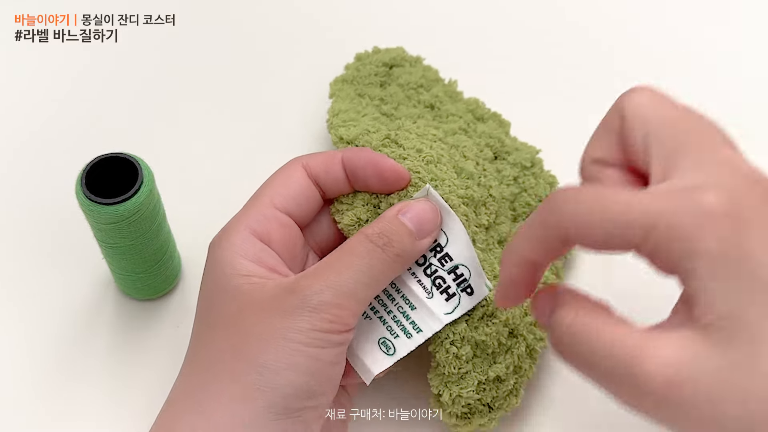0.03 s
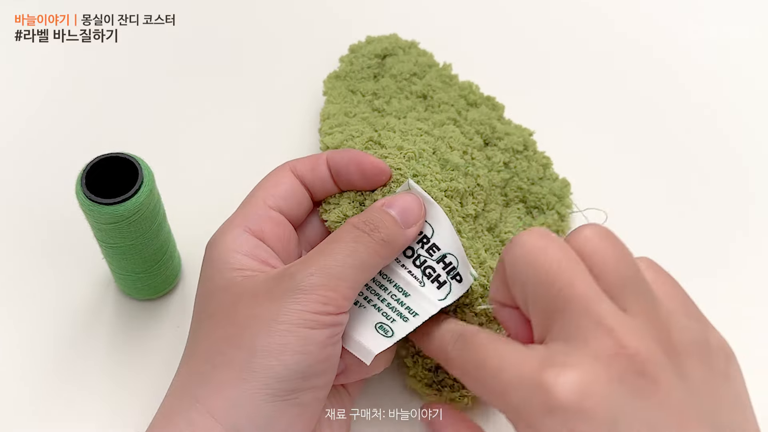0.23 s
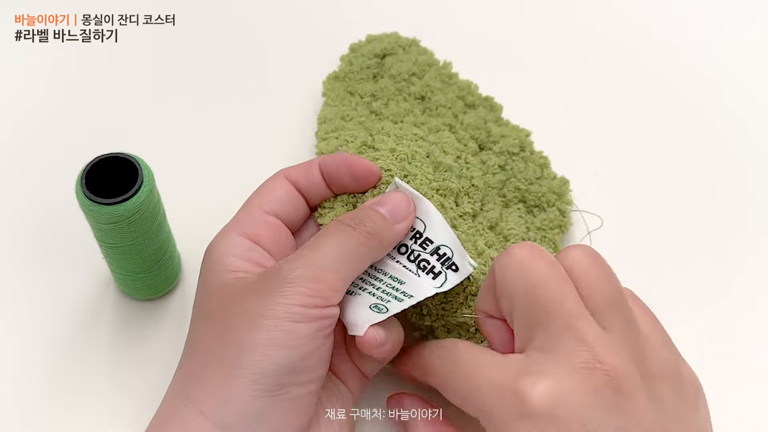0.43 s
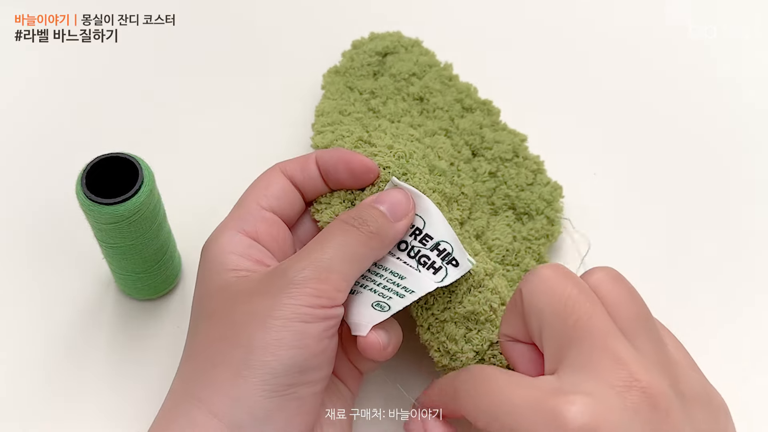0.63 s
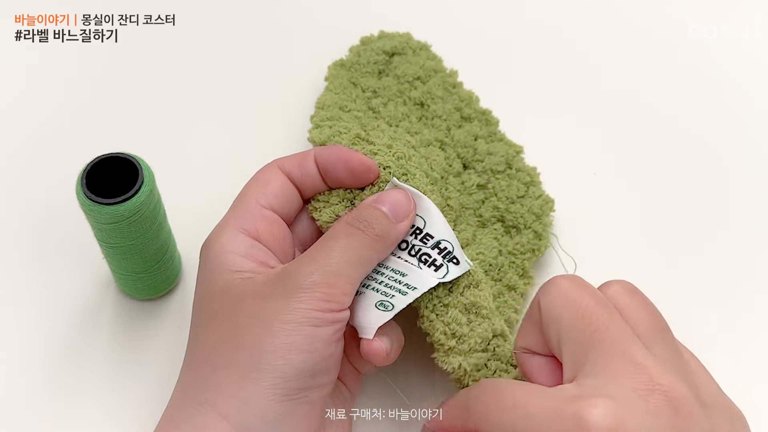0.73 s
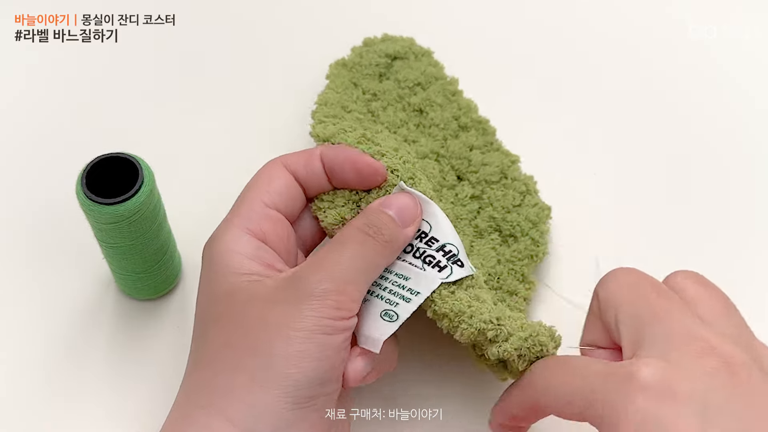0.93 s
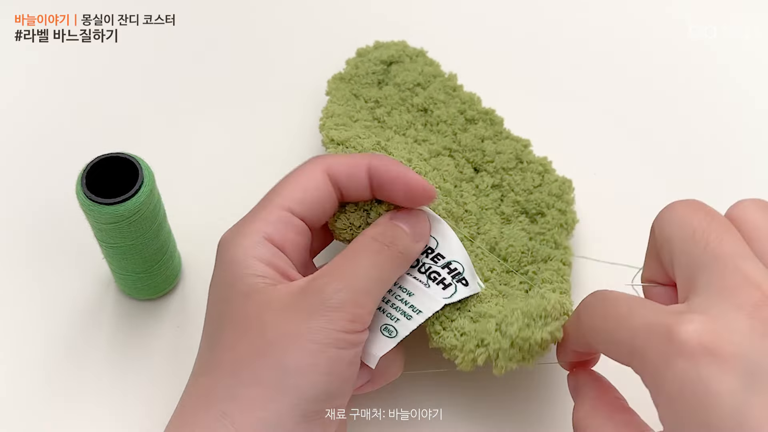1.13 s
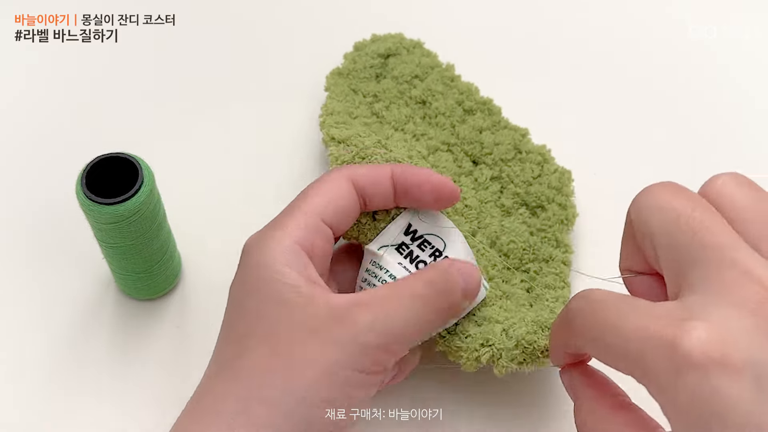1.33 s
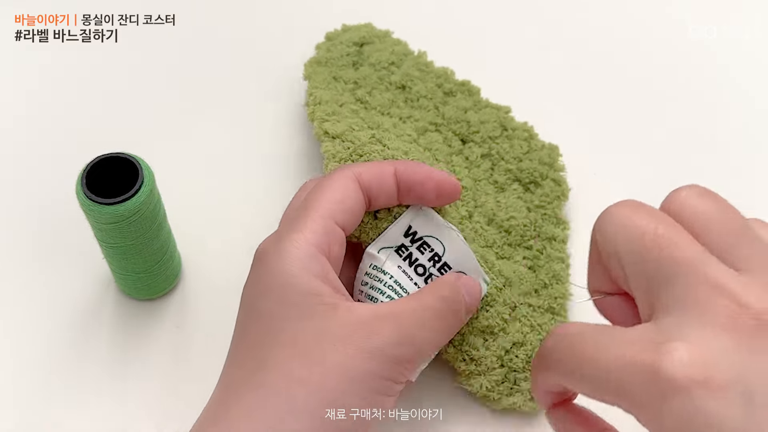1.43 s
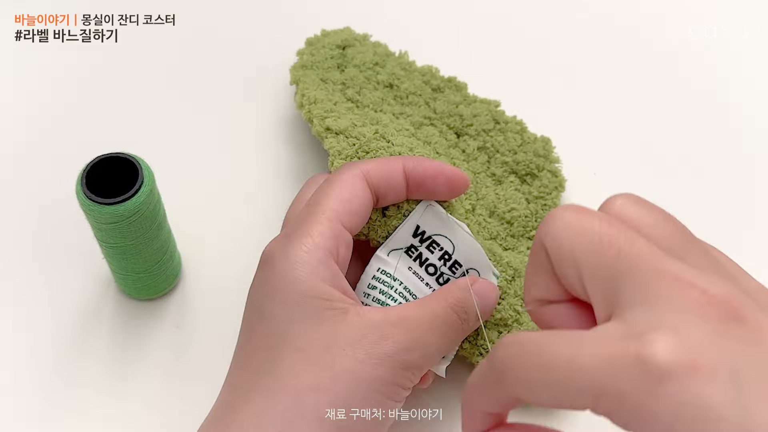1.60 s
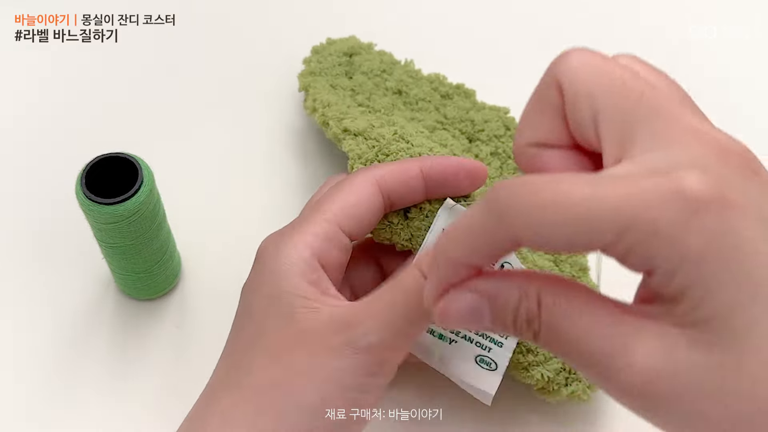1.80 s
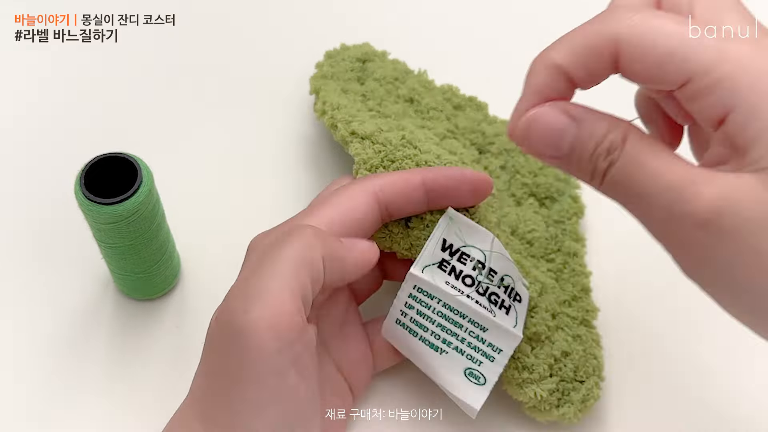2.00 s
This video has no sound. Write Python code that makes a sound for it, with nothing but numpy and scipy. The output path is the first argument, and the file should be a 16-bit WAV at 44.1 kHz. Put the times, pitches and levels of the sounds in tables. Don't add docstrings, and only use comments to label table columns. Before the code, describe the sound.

Thread pulled through a cloth label and soft knitted mat: a smooth opening hiss, a crackly scuff with snaps, a longer slide, then scattered ticks and a sharper snap near the end; close microphone, quiet room.

```python
import sys
import numpy as np
from scipy import signal
from scipy.io import wavfile

SR = 44100
rng = np.random.default_rng(int(sys.argv[2]) if len(sys.argv) > 2 else 0)


def magnitude_from_level(level_db):
    exponent = np.asarray(level_db, float) / 20
    return 10 ** exponent


def transcribe(signal):
    frames = np.atleast_2d(signal).T
    limited = np.clip(frames, -1, 1)
    pcm = np.round(limited * 32767).astype(np.int16)
    wavfile.write(sys.argv[1], SR, pcm)


N = 90625

# f/Hz, density/(dB per Hz)
ROOM_COLOUR = [(88, -44), (150, -12), (221, -9.5), (1570, -16.5), (1870, -17), (3220, -18), (4840, -22.5),
               (5990, -21), (15500, -31)]
ROOM_DB = -66.5
# f/Hz, width/Hz, level/dB
BUILDING_RUMBLE = [(35, 9.6, -73.5), (61, 20, -81), (85.1, 15.2, -78), (315.5, 60, -80)]
# f/Hz, wobble/share of f, level/dB
TABLE_TONES = [(163, .05, -61), (107.4, 0.044, -60), (190.8, 0.019, -67.5)]
TABLE_PEAKS = [.06, .082, 0.13]
TABLE_RISES = [40, 300, 60]
TABLE_FALLS = [150, 256, 148]
# t/s, rise/s, fall/s, level/dB, f/Hz
RINGING_STRETCHES = [(.03, 0.099, 0.16, -66.5, 4900), (0.068, 0.034, 0.045, -73, 3480),
                     (1.74, .05, .11, -68, 5250), (.45, 0.064, .08, -72, 1250), (.395, .02, .02, -59.5, 2100),
                     (.403, .012, .02, -60, 1350), (1.88, .02, .04, -63, 1600), (1.93, .02, .03, -69, 860),
                     (.39, 0.016, .03, -59, 7230), (.378, .002, 0.017, -59, 6600),
                     (.405, .012, .015, -64, 12500), (1.26, .01, .04, -68, 2200),
                     (1.885, .015, .015, -65, 8500), (1.725, .025, .03, -65.5, 600),
                     (0.504, .08, 0.25, -71, 315), (1.93, 0.064, 0.056, -71.5, 333),
                     (1.33, .03, .04, -70.5, 2430), (1.73, 0.014, .012, -60, 1790),
                     (1.28, 0.14, 0.19, -74, 539), (1.935, 0.016, 0.031, -69, 597)]
# t/s, peak level/dB, f/Hz, ring/s
TICKS_AND_SNAPS = [(.9229, -46, 2000, .003), (1.506, -50, 3900, .003), (1.508, -45, 2500, .004),
                   (1.5092, -46, 3900, .003), (.9862, -50, 1300, .004), (1.1235, -47, 2600, .006),
                   (1.4055, -47, 2000, .003), (1.4395, -53, 2000, .003), (1.601, -53, 2200, .003),
                   (.878, -53, 7000, .002), (1.7478, -42, 1870, .006), (.3985, -47, 2400, .002),
                   (.3785, -48, 2100, .004), (.4195, -45, 1400, .004), (1.9475, -44, 2400, .003),
                   (1.948, -46, 1500, .005), (1.557, -54, 3300, .003), (1.264, -50, 2300, .004),
                   (.4132, -43, 1500, .003),
    (.4146, -38, 5500, .001),
    (.9224, -40, 4200, .0012),
    (1.7474, -35, 6000, .002),
    (.8905, -43, 7000, .0015),
]
# t/s, rise/s, fall/s, level/dB, brightness/(dB per octave)
LABEL_SCUFFS = [(.378, .001, 0.024, -56.5, -1), (.391, 0.0085, .012, -54, 1.5),
                (.406, .009, 0.024, -48.5, -.5), (.43, 0.0087, 0.033, -63.5, -5),
                (1.26, .005, .05, -60.5, -4), (1.335, 0.0077, .045, -65.5, -5.5),
                (1.505, 0.0026, 0.0069, -57.5, -1), (1.8, 0.018, 0.044, -70, -4.5),
                (1.733, 0.011, 0.013, -52, 0.5), (1.875, .025, 0.046, -55.5, -3),
                (1.943, 0.0037, 0.0084, -55, -3), (1.118, 0.004, .01, -63, -0.5),
                (.982, 0.0037, 0.0067, -67, -3), (0.71, 0.025, 0.035, -69, -6)]
# f/Hz, density/(dB per Hz)
LABEL_COLOUR = [(250, -34), (500, -13.5), (1000, -12.5), (2200, -5.5), (4400, -10), (7000, -4.5),
                (10800, -14.5), (15500, -14)]
# f/Hz, width/Hz, level/dB
LABEL_RESONANCES = [(1416, 200, -15), (2130, 200, -14), (3320, 100, -16), (7000, 230, -13.5),
                    (8400, 770, -19.5), (12400, 670, -35)]
# t/s, rise/s, fall/s, level/dB, brightness/(dB per octave)
THREAD_PULLS = [
    (0.0087, 0.095, 0.16, -60.5, 1.5),
    (0.204, 0.085, 0.052, -71.5, 0.5),
    (.44, .03, 0.23, -70, -5),
    (.6, 0.077, 0.29, -61.5, 0.5),
    (1.13, 0.044, 0.048, -60.5, 1),
    (1.67, 0.058, 0.066, -58.5, -1),
    (1.75, 0.043, 0.2, -64, 3.5),
    (.78, 0.07, 0.065, -72, -1.5),
    (.14, 0.058, 0.042, -71, -3),
    (1.4, 0.22, .1, -72.5, -6.5),
]
# f/Hz, density/(dB per Hz)
THREAD_COLOUR = [(290, -20), (500, -7.5), (748, -10.5), (1450, -3), (1670, -10), (1820, -3.5), (4980, -4),
                 (15500, -19)]
# f/Hz, width/Hz, level/dB
THREAD_RESONANCES = [(3510, 190, -16.5), (6710, 360, -14.5)]
PORT_HISS_BAND = [8860, 13900]
PORT_OFFSET = [
    [-.0333],
    [-.0389],
]


def rms_one(x):
    return x / np.sqrt(np.mean(x ** 2) + 1e-20)


def drift(rate_hz):
    r = np.exp(-80 * np.pi * rate_hz / SR)
    noise = rng.standard_normal(N // 40 + 2002)
    slow = signal.lfilter([1], [1, -2 * r, r * r], noise)[2000:]
    return np.interp(np.arange(N) / 40, np.arange(len(slow)), rms_one(slow))


def resonate(x, hz, width_hz):
    r = np.exp(-np.pi * width_hz / SR)
    zeros = np.array([1, 0, -1]) * (1 - r * r) / 2
    poles = [1, -2 * r * np.cos(2 * np.pi * hz / SR), r * r]
    return signal.lfilter(zeros, poles, x)


def bandpass(x, edges_hz):
    return signal.sosfilt(signal.butter(2, edges_hz, "band", fs=SR, output="sos"), x)


def swell(t, start, rise, fall):
    return np.interp(t, [start, start + rise, start + rise + fall], [0, 1, 0])


def bands(source, colour, patchy_db, rate_hz):
    edges = 100 * 2 ** np.arange(0, 7.6, .5)
    centres = np.sqrt(edges[1:] * edges[:-1])
    points = np.array(colour)
    level = np.interp(np.log(centres), np.log(points[:, 0]), points[:, 1], left=points[0, 1] - 8)
    parts = []
    for k in range(len(centres)):
        gain = magnitude_from_level(level[k] + patchy_db * drift(rate_hz))
        parts.append(gain * bandpass(source[k % 2], edges[k:k + 2]))
    return np.array(parts), centres


def grains(per_s, spread_db):
    size = magnitude_from_level(spread_db * np.minimum(rng.exponential(1, (2, N)), 4))
    sign = rng.choice([-1, 1], (2, N))
    slips = rng.random((2, N)) < per_s / SR
    return rms_one(size * sign * slips)


def rubbing(strokes, source, colour, resonances, curve, patchy_db, rate_hz):
    parts, hz = bands(source, colour, patchy_db, rate_hz)
    parts = parts / np.sqrt(np.mean(parts.sum(0) ** 2))
    rings = []
    for k, (f, width, db) in enumerate(resonances):
        gain = magnitude_from_level(db + patchy_db * drift(rate_hz))
        rings.append(gain * rms_one(resonate(source[k % 2], f, width)))
    parts = np.vstack([parts, rings])
    hz = np.append(hz, [peak[0] for peak in resonances])
    octaves = np.log2(hz / 3320)
    out, t = np.zeros(N), np.arange(N) / SR
    for start, rise, fall, db, bright_db in strokes:
        shape = swell(t, start, rise, fall) ** curve
        on = shape > 0
        out[on] += shape[on] * (magnitude_from_level(db + bright_db * octaves) @ parts[:, on])
    return out


def building_hum():
    noise = rng.standard_normal((len(BUILDING_RUMBLE), N + SR))
    out = np.zeros(N)
    for stream, (hz, width, db) in zip(noise, BUILDING_RUMBLE):
        ringing = resonate(resonate(stream, hz, width), hz, width)
        out += magnitude_from_level(db) * rms_one(ringing[SR:])
    return out


def room():
    parts, _ = bands(rng.standard_normal((2, N)), ROOM_COLOUR, patchy_db=0.9, rate_hz=5.8)
    return magnitude_from_level(ROOM_DB) * rms_one(parts.sum(0)) + building_hum()


def table():
    t, out = np.arange(N) / SR, np.zeros(N)
    for (hz, wobble, db), peak, up, down in zip(TABLE_TONES, TABLE_PEAKS, TABLE_RISES, TABLE_FALLS):
        pitch = hz * (1 + wobble * drift(12))
        tone = np.sqrt(2) * np.sin(2 * np.pi * np.cumsum(pitch) / SR)
        slope_db = np.minimum(up * (t - peak), -down * (t - peak))
        out += tone * magnitude_from_level(db + 2.0 * drift(15) + slope_db)
    return out


def singing():
    out, t = np.zeros(N), np.arange(N) / SR
    streams = rng.standard_normal((len(RINGING_STRETCHES), N))
    for (start, rise, fall, db, hz), noise in zip(RINGING_STRETCHES, streams):
        tone = rms_one(resonate(noise, hz, 0.05 * hz))
        out += magnitude_from_level(db) * swell(t, start, rise, fall) * tone
    return out


def needle():
    out, t = np.zeros(N + 1000), np.arange(900) / SR
    ratio = np.array([[1], [1.47], [.62]])
    gain = magnitude_from_level(np.array([[-2], [-12], [-12]]))
    for start, db, hz, ring_s in TICKS_AND_SNAPS:
        tones = gain * np.sin(2 * np.pi * hz * ratio * t)
        pulse = tones.sum(0) * magnitude_from_level(-30 * t / ring_s)
        first = int(start * SR)
        out[first:first + 900] += magnitude_from_level(db) * pulse
    return out[:N]


def label():
    slips = grains(per_s=11000, spread_db=3.3)
    return rubbing(LABEL_SCUFFS, slips, LABEL_COLOUR, LABEL_RESONANCES, curve=0.93, patchy_db=1.4, rate_hz=29)


def thread():
    slips = grains(per_s=9000, spread_db=2.7)
    return rubbing(THREAD_PULLS, slips, THREAD_COLOUR, THREAD_RESONANCES, curve=0.9, patchy_db=1.0, rate_hz=11)


def scene():
    mono = room() + table() + singing() + needle() + label() + thread()
    return np.ones((2, 1)) * mono


def top_cut(x):
    return signal.sosfilt(signal.butter(12, 15710, fs=SR, output="sos"), x)


def record(dry):
    noise = rng.standard_normal((2, 2, N))
    hiss = bandpass(noise[0], PORT_HISS_BAND)
    rumble = signal.sosfilt(signal.butter(1, 603, fs=SR, output="sos"), noise[1])
    ports = magnitude_from_level(-86.5) * rms_one(hiss) + magnitude_from_level(-92) * rms_one(rumble)
    mix = dry + ports + np.array(PORT_OFFSET)
    return top_cut(mix)


dry = scene()
out = record(dry)
transcribe(out)
```